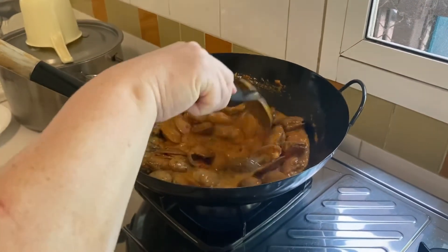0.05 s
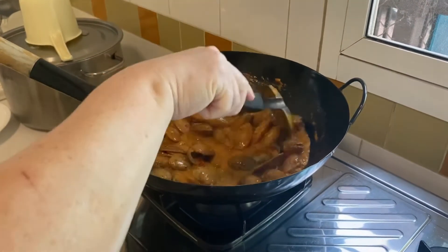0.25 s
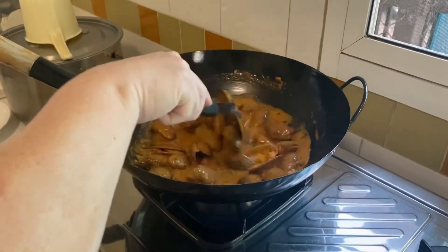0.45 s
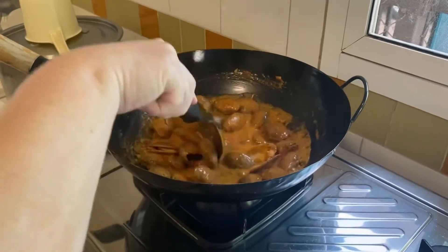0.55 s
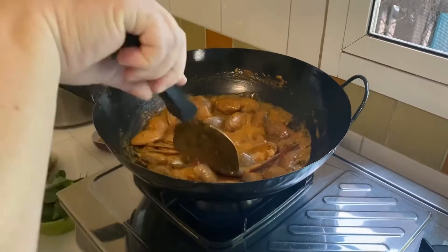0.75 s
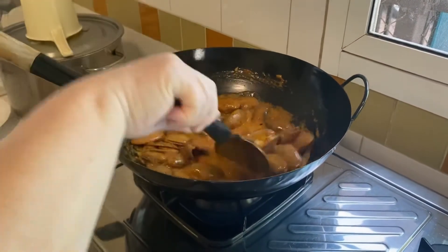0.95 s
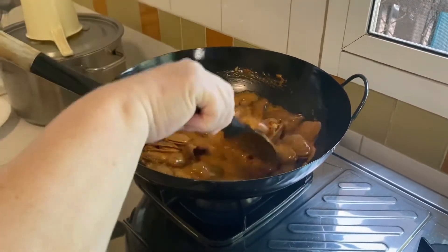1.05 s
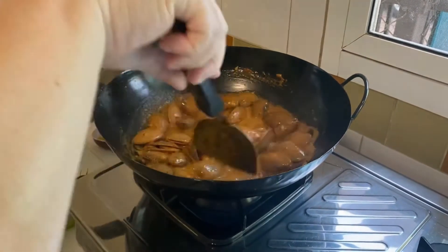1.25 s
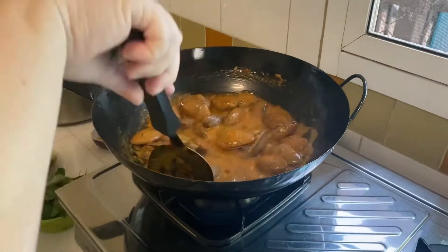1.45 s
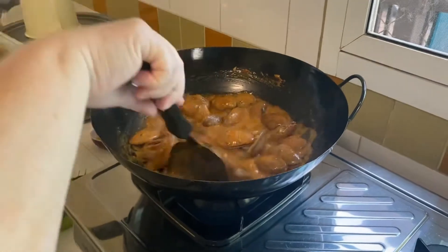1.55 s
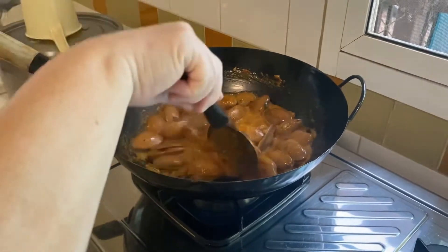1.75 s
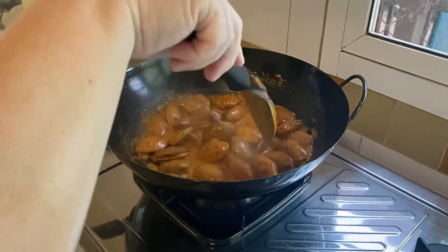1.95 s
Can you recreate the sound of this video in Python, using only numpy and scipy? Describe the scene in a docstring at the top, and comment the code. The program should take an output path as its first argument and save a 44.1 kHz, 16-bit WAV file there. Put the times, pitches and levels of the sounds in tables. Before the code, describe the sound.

A spatula scrapes through clams in a wok, shells clacking in thick sauce.

```python
"""A spatula scrapes through clams in thick sauce: three stirring strokes in a steel wok.
Each stroke rubs over the steel, churns the sauce and tumbles shells that clack on each other and
on the pan. The wok rings with every contact and the tiled kitchen adds a short tail.
Underneath are a faint sizzle, the rush of the burner and a motor hum."""
import sys
import numpy as np
from scipy import signal
from scipy.fft import rfft, irfft
from scipy.io import wavfile

SR = 44100
rng = np.random.default_rng(int(sys.argv[2]) if len(sys.argv) > 2 else 0)


def file_out(sig):
    """Save sig as 16-bit WAV at sys.argv[1]."""
    # one column per channel
    cols = np.atleast_2d(sig).T
    # limit, then scale
    lim = np.clip(cols, -1, 1)
    pcm = np.round(lim * 32767).astype(np.int16)
    wavfile.write(sys.argv[1], SR, pcm)


N = 88200
TIME = np.arange(N) / SR

# The steel bowl's modes, lowest first. Each row: pitch in Hz, relative level in dB.
WOK_MODES = [(292, -1.5), (536, -17), (1001, -14.5), (2610, -17), (4712, -14)]


def from_db(db):
    """Decibels to gain."""
    return 10 ** (np.asarray(db) / 20)


def rms_one(x):
    """Scale to unit rms."""
    return x / np.sqrt(np.mean(x ** 2) + 1e-20)


def level(curve):
    """Gain over time from (s, dB) points."""
    return from_db(np.interp(TIME, *np.transpose(curve)))


def at_hz(points):
    """A (Hz, value) table read at every frequency of the spectrum."""
    hz, value = np.transpose(points)
    return np.interp(np.log(np.fft.rfftfreq(N, 1 / SR) + 1), np.log(hz), value)


def colour(x, eq):
    """Shape x with an EQ curve of (Hz, dB) points, then scale to unit rms."""
    return rms_one(irfft(rfft(x) * from_db(at_hz(eq)), N))


def band(x, edges_hz):
    """Band-pass."""
    edges_hz = np.clip(edges_hz, 20, SR / 2 - 500)
    return signal.sosfilt(signal.butter(2, edges_hz, "band", fs=SR, output="sos"), x)


def resonate(x, hz, width_hz):
    """One damped resonance with unit gain at its peak."""
    r = np.exp(-np.pi * width_hz / SR)
    feedback = [1, -2 * r * np.cos(2 * np.pi * hz / SR), r * r]
    return signal.lfilter(np.array([1, 0, -1]) * (1 - r * r) / 2, feedback, x + 1e-18)


def grains(per_s, spread_db):
    """Random clicks of uneven size, as mid and side."""
    born = rng.random(N) < per_s / SR
    size = from_db(spread_db * np.minimum(rng.exponential(1, N), 4))
    return born * size * rng.choice([-1, 1], (2, N))


def chatter(length_s, rise_s=0.00033, impact_s=0.00046, impact_db=-7):
    """Force of one contact, as mid and side: a sharp first touch, then a dying rattle."""
    t = TIME[:SR // 8]
    impact = from_db(impact_db) * np.exp(-t / impact_s)
    force = (np.exp(-t / length_s) + impact) * (1 - np.exp(-t / rise_s))
    return rng.standard_normal((2, len(t))) * force


def add(out, s, part, db, boost_db=16, side_db=-6):
    """Mix in one part of a contact at time s, with its relative energy set by db."""
    start = int(s * SR)
    unit_energy = part / np.linalg.norm(part, axis=1, keepdims=True)
    part = from_db(boost_db + db) * unit_energy * from_db([[0], [side_db]]) / 2
    out[:, start:start + part.shape[1]] += part[:, :N - start]


def taps(rows, length_s, q):
    """Contacts that sound one damped resonance each, from (s, dB, Hz) rows."""
    out = np.zeros((2, N))
    for s, db, hz in rows:
        add(out, s, resonate(chatter(length_s), hz, hz / q), db)
    return out


def motor(waver_db=3.5):
    """A motor hums in the mid channel, each partial wavering in level."""
    # Each row: pitch in Hz, level in dB.
    partials = [(60.5, -59), (98.5, -53), (121.5, -47.5), (183, -52)]
    hum = 0
    for hz, db in partials:
        waver = np.interp(TIME, np.linspace(0, TIME[-1], 16), rng.standard_normal(16))
        tone = np.sqrt(2) * np.sin(2 * np.pi * (hz * TIME + rng.random()))
        hum = hum + from_db(db + waver_db * waver) * tone
    return np.outer([1, 0], hum)


def burner():
    """The burner's steady, low rush."""
    # Each row: frequency in Hz, relative gain in dB.
    rush_eq = [(25, -23), (60, -9), (110, 3.5), (300, -11), (600, -19), (5000, -25.5), (9000, -82)]
    return from_db(-47.5) * colour(rng.standard_normal((2, N)), rush_eq)


def sizzle():
    """The hot sauce sizzles in tiny pops."""
    # Each row: frequency in Hz, relative gain in dB.
    pop_eq = [(500, -8), (1500, 25), (5000, -2), (9000, -10)]
    return from_db(-64.5) * colour(grains(per_s=340, spread_db=7.5), pop_eq)


def kitchen(x, t60_s=0.69, treble_t60_s=0.54, split_hz=8700, delay_s=0.008, wet_db=-10):
    """A diffuse tail off the tiles; the treble dies sooner."""
    noise = rng.standard_normal((2, N))
    body = band(noise, (120, split_hz)) * from_db(-60 * TIME / t60_s)
    treble = band(noise, (split_hz, 17000)) * from_db(-60 * TIME / treble_t60_s)
    tail = rms_one((body + treble) * (TIME > delay_s)) / np.sqrt(N)
    return from_db(wet_db) * signal.fftconvolve(x[:1], tail, axes=1)[:, :N]


def boom(t60_s=0.35):
    """A hard push flexes the whole bowl, which hums in its lowest mode."""
    # Each row: start in seconds, level in dB.
    pushes = [(0.834, -33), (0.95, -27.5)]
    envelope = sum(from_db(db - 60 * np.abs(TIME - s) / t60_s) * (TIME >= s) for s, db in pushes)
    return np.outer([1, 0], envelope * np.sin(2 * np.pi * WOK_MODES[0][0] * TIME))


def wok(contacts, boost_db=13.5, t60_s=0.067):
    """The steel rings briefly with every contact."""
    width_hz = np.log(1000) / (np.pi * t60_s)
    return sum(from_db(boost_db + db) * resonate(contacts, hz, width_hz) for hz, db in WOK_MODES)


def sauce(plops_per_s=500, q=8):
    """Air pockets plop in the churned sauce, each ringing a few cycles."""
    # The swell of the churning. Each row: time in seconds, level in dB.
    churn = [(0, -42), (.18, -46.5), (.31, -40.5), (.56, -40.5), (.74, -48.5), (.95, -38.5), (1.38, -52.5),
             (1.48, -37.5), (1.62, -38.5), (1.85, -49.5)]
    # Each row: frequency in Hz, relative gain in dB.
    plop_eq = [(80, -2), (160, -2.5), (290, 3), (570, 2), (1200, -7.5), (3000, -25)]
    pitches = np.geomspace(160, 1300, 12)
    plops = 0
    for hz in pitches:
        pockets = grains(plops_per_s / len(pitches), spread_db=3.4)
        plops = plops + rms_one(resonate(pockets, hz, hz / q))
    return level(churn) * colour(plops, plop_eq)


def scrape(slips_per_s=4500, tinkles_per_s=980, jerks_per_s=170, jerk_db=3, catch_s=0.012):
    """Spatula and shells stick and slip on the steel, tinkling and at times catching with a crunch."""
    # The spatula's pressure, heard as loudness. Each row: time in seconds, level in dB.
    pressure = [(0, -44), (.06, -41.5), (.12, -50.5), (.205, -49.5), (.225, -34.5), (.42, -33), (.69, -35),
                (.78, -50.5), (.79, -29.5), (.89, -32), (1.04, -39.5), (1.15, -45), (1.40, -48.5),
                (1.425, -30), (1.60, -30.5), (1.83, -45.5)]
    # Each row: frequency in Hz, relative gain in dB.
    scrape_eq = [(200, -7), (600, -4.5), (1200, 1.5), (3300, -1.5), (4900, -2), (6200, -4), (16000, -9)]
    # The spatula catches briefly. Each row: start in seconds, accent in dB.
    catches = [(.041, 12.5), (0.416, 7), (0.937, 14), (1.47, 5), (1.509, 5), (1.557, 11)]
    crunch_hz, tinkle_q, tinkle_db, spread_db = (862, 6660), 15, -7, 1.5
    grip = sum((from_db(db) - 1) * (TIME >= s) * np.exp(-np.abs(TIME - s) / catch_s)
               for s, db in catches)
    slips = colour(grains(slips_per_s, spread_db), scrape_eq)
    tinkle = sum(resonate(grains(tinkles_per_s / 20, spread_db), hz, hz / tinkle_q)
                 for hz in np.geomspace(*crunch_hz, 20))
    jerks = from_db(jerk_db * np.interp(TIME * jerks_per_s, np.arange(N), rng.standard_normal(N)))
    rubbing = rms_one(jerks * (slips + from_db(tinkle_db) * colour(tinkle, scrape_eq)))
    return level(pressure) * (rubbing + grip * band(slips, crunch_hz))


def spatula_bumps():
    """The spatula bumps the pan through the food with a hollow knock."""
    # Each row: start in seconds, relative level in dB, pitch in Hz.
    bumps = [(0.289, -7.5, 1030), (0.527, -10.5, 554), (0.946, -8.5, 954), (1.682, -19, 1070),
             (1.962, -27, 950)]
    return band(taps(bumps, length_s=0.0057, q=2.5), (407, 2610))


def shell_ticks():
    """A single shell is flicked or dragged and rings briefly."""
    # Each row: start in seconds, relative level in dB, pitch in Hz.
    ticks = [(0.267, -26, 10400), (0.309, -15.5, 4540), (0.347, -27, 10300), (0.3762, -13, 1550),
             (0.535, -9, 4230), (0.56, -16, 2420), (0.697, -13.5, 2420), (0.786, -17.5, 11000),
             (1.3014, -16, 1590), (1.416, -13, 3090), (1.427, -11.5, 1450), (1.4715, -16, 1340),
             (1.492, -10, 4500), (1.51, -12.5, 4600), (1.549, -17, 3160), (1.601, -19.5, 11100)]
    return taps(ticks, length_s=0.0027, q=9.5)


def shell_clacks(knock_q=6, shell_q=6.5, snap_growth=1.165):
    """Tumbling shells chatter for a few ms: a crack, a snap, a thud, a pan knock and a shell's ring."""
    # Each row: start in seconds, crack level in dB, chatter decay in seconds, knock pitch in Hz,
    # knock level in dB, shell pitch in Hz, shell level in dB. The levels are relative.
    hits = [ (0.212, -7, 0.0047, 2260, -11, 3300, -20.5), (0.288, -9.5, 0.0051, 1560, -11.5, 4510, -46),
            (0.396, -5.5, 0.0076, 873, -12.5, 1540, -10.5), (0.436, -12.5, 0.0047, 1640, -32, 2160, -19),
            (0.475, -9.5, 0.0026, 1730, -18, 4160, -12.5), (0.49, -10, 0.0055, 1660, -38, 2560, -14.5),
            (0.525, -6, 0.0047, 1000, -13, 4150, -10.5), (0.571, -11.5, 0.0059, 3900, -15.5, 7800, -11.5),
            (0.645, -17.5, 0.0082, 6580, -8.5, 5420, -6), (0.799, -5, 0.0026, 1470, -10, 2500, -31),
            (0.83, -6, 0.0052, 1570, -16, 2590, -11), (0.856, -5.5, 0.0099, 1660, -10, 2820, -5.5),
            (0.8749, -28, 0.0018, 1680, -11, 4250, -3), (0.945, -9, 0.01, 1800, -10.5, 4580, -10.5),
            (1.054, -17, 0.0026, 1610, -10.5, 5070, -18), (1.415, -6.5, 0.011, 1470, -8.5, 5270, -3),
            (1.628, -14, 0.0025, 1700, -5, 2580, -13), (1.7188, -18, 0.0034, 1040, -28, 4550, -13.5)]
    crack_hz, snap_hz, thud_hz = (1380, 7930), (5560, 17260), (413, 870)
    out = np.zeros((2, N))
    for s, crack_db, length_s, knock_hz, knock_db, shell_hz, shell_db in hits:
        force = chatter(length_s)
        add(out, s, band(force, crack_hz), crack_db)
        add(out, s, band(force, snap_hz), snap_growth * crack_db)  # harder cracks are brighter
        add(out, s, band(force, thud_hz), crack_db - 17)
        add(out, s, resonate(force, knock_hz, knock_hz / knock_q), knock_db)
        add(out, s, resonate(force, shell_hz, shell_hz / shell_q), shell_db)
    return out


def microphones(mid_side):
    """Mid and side become left and right, with the pair's width, balance and phase."""
    # Each row: frequency in Hz, gain of the side channel in dB.
    width = [(60, -16), (250, -15), (600, -2.5), (5500, -5.5), (7400, -19.5)]
    # Each row: frequency in Hz, left over right in dB.
    balance = [(60, 0.1), (300, 3), (1000, 2), (1550, -0.5), (2500, 2), (5400, 4.5), (6800, 0), (16000, 0)]
    # Each row: frequency in Hz, phase lead of the left channel in radians.
    lead = [(30, 0), (700, -.4), (2200, .7), (7400, 0), (8500, -2.8), (9600, -3.5), (10400, -6.2),
            (11600, -6.4), (12550, -9.1), (13700, -9.8), (14800, -12.5)]
    mid, side = rfft(mid_side)
    side = side * from_db(at_hz(width))
    tilt = from_db(at_hz(balance) / 2)
    left = (mid + side) * tilt * np.exp(1j * at_hz(lead))
    right = (mid - side) / tilt
    return irfft(np.array([left, right]), N)


def scene():
    """Stirring in the wok, in the kitchen, over the stove."""
    contacts = shell_clacks() + shell_ticks() + spatula_bumps() + scrape()
    pan = contacts + wok(contacts) + sauce()
    return microphones(pan + kitchen(pan) + boom() + motor() + burner() + sizzle())


def record(dry):
    """A steep low-pass cuts the treble above 15.8 kHz."""
    return signal.sosfilt(signal.ellip(10, .2, 80, 15800, fs=SR, output="sos"), dry)


dry = scene()
out = record(dry)
file_out(out)
```